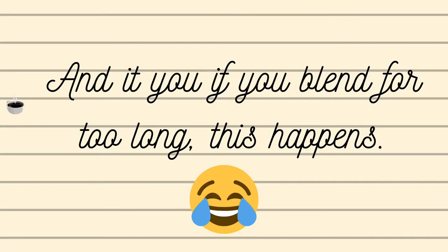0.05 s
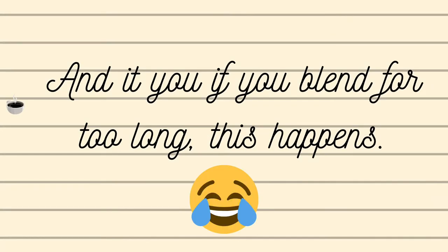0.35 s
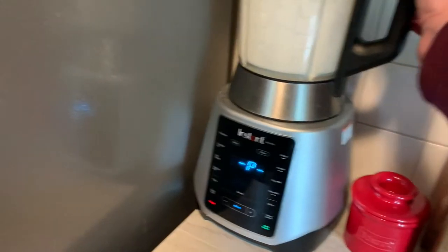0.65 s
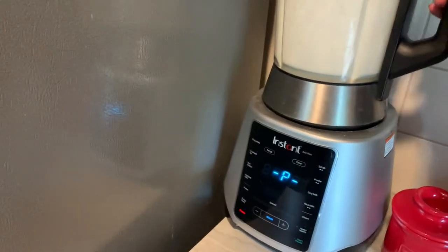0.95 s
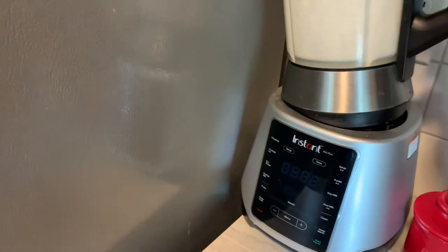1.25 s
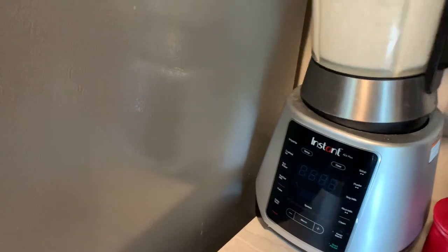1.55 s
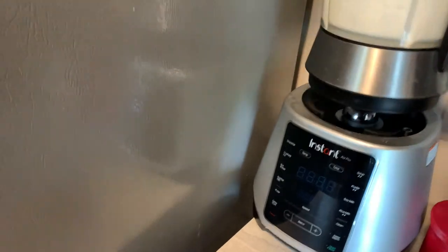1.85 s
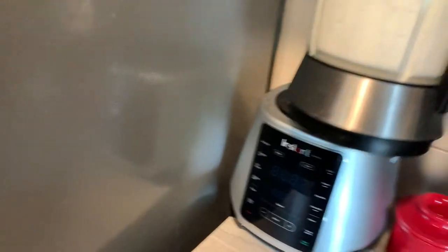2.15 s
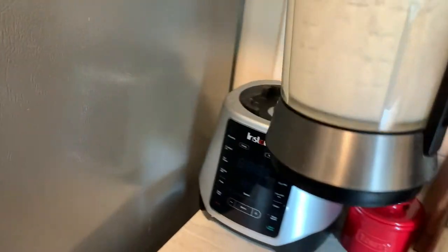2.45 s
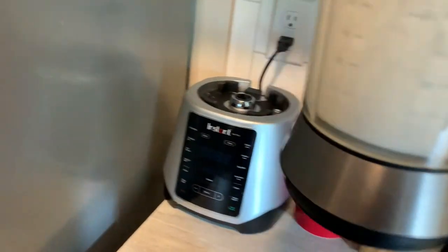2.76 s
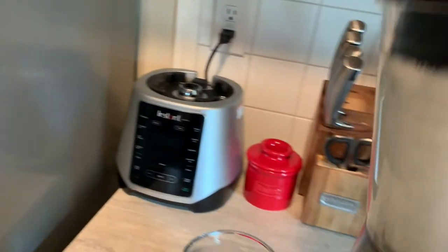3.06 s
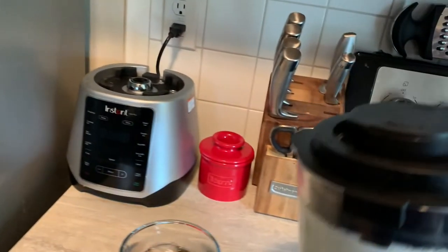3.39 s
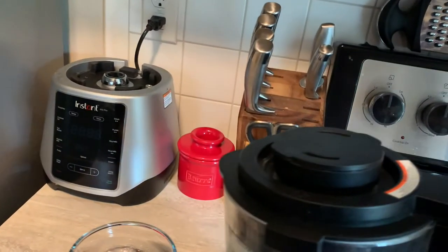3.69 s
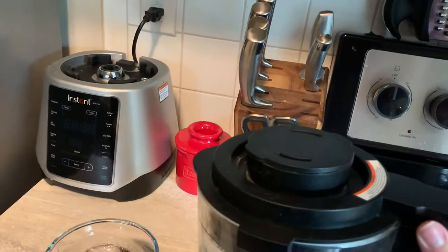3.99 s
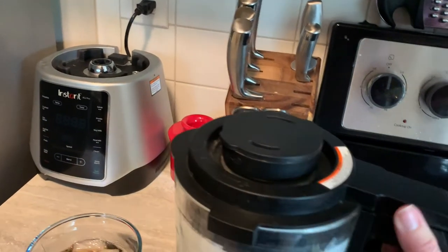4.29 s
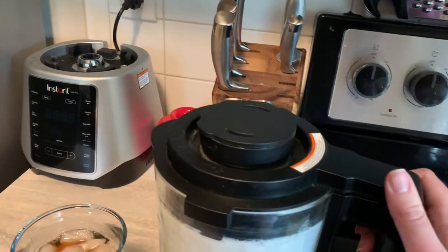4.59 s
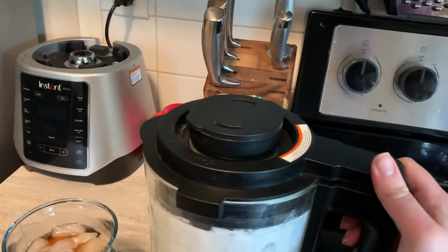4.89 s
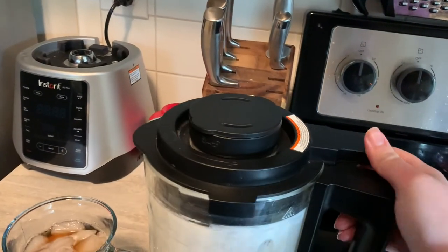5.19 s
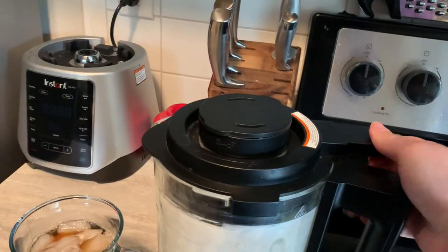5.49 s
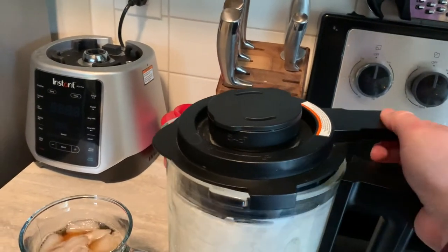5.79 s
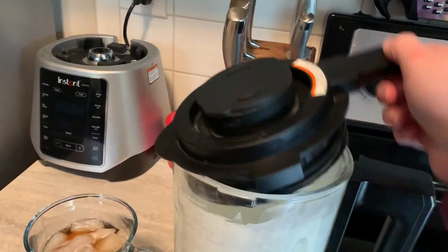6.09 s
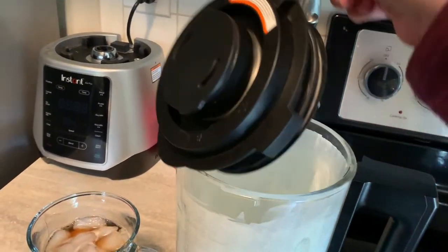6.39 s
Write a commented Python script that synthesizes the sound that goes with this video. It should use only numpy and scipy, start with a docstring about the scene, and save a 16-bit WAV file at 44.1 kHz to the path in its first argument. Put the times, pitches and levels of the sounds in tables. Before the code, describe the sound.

Heard up close in a small, hard-walled kitchen, a filled blender pitcher clicks, scrapes and bumps as it is worked off its base, the steel coupling pinging briefly. A sleeve swishes faintly, then the pitcher thumps down on the counter and wobbles, the loudest moment. Sharp plastic snaps follow, and the lid drags free with tiny squeaks and hollow taps. A low refrigerator hum continues underneath.

```python
"""A full plastic blender jug is worked off its base, set on a kitchen counter, and its lid pulled off.
Impacts excite damped normal modes: the jug clicks and knocks, the steel drive coupling pings, the
counter booms as the jug rocks to rest, and the lid's catches snap open. Sliding friction gives the
noise of rubbing plastic, grit and a brushing sleeve; stick-slip motion makes the rubber seal squeak.
The small, hard room reverberates, and a refrigerator hums throughout."""
import sys
import numpy as np
from scipy import signal
from scipy.fft import rfft, irfft, next_fast_len
from scipy.io import wavfile
from scipy.ndimage import uniform_filter1d

SR = 44100
rng = np.random.default_rng(int(sys.argv[2]) if len(sys.argv) > 2 else 0)


def put_to_file(sound):
    """Save the sound as 16-bit audio at rate SR, in the file named by the first command-line argument."""
    columns = np.atleast_2d(sound).T  # one column per channel
    safe = np.clip(columns, -1, 1)
    whole_steps = np.round(safe * 32767)
    wavfile.write(sys.argv[1], SR, whole_steps.astype(np.int16))


N = 293079
TIME = np.arange(N) / SR
RING_TIME = TIME[:SR // 3]


def undb(db):
    """Logarithmic level: decibels to amplitude ratio."""
    return 10 ** (np.asarray(db) / 20)


def decay(t60, t=RING_TIME):
    """Exponential damping: the amplitude falls by 60 dB in t60 seconds."""
    return np.exp(-np.log(1000) * t / t60)


def add(track, s, sound):
    """Superposition: a sound is summed into a track from time s on."""
    i = int(s * SR)
    track[..., i:i + sound.shape[-1]] += sound[..., :N - i]


def colour(x, spectrum):
    """Spectral shaping: x is filtered by (Hz, dB) points, falling steeply above the last; rms 1."""
    hz, db = np.transpose(spectrum)
    size = next_fast_len(x.shape[-1], True)
    f = np.fft.rfftfreq(size, 1 / SR) + 1
    gain = undb(np.interp(np.log(f), np.log(hz), db)) * np.minimum(hz[-1] / f, 1) ** 10
    y = irfft(rfft(x, size) * gain, size)[..., :x.shape[-1]]
    return y / np.std(y)


def stereo_noise(size, apart_hz=700, width=0.8):
    """Spatial coherence: white noise at two nearby points is alike in the bass, less so in the treble."""
    padded = next_fast_len(size, True)
    f = np.fft.rfftfreq(padded, 1 / SR)
    share = width * f / np.hypot(f, apart_hz)
    mid, side = rfft(rng.standard_normal((2, padded)))
    channels = np.array([mid + share * side, mid - share * side]) / np.sqrt(1 + share ** 2)
    return irfft(channels, padded)[:, :size]


def place(x, lag_s, pan_db):
    """Time and level cues to direction: the left channel is lag_s later and pan_db louder."""
    left, right = np.broadcast_to(x, (2, x.shape[-1]))
    t = TIME[:len(left)]
    return np.array([np.interp(t - lag_s, t, left) * undb(pan_db / 2), right * undb(-pan_db / 2)])


def wander(per_s):
    """Random modulation: per_s smoothed steps a second, with a spread near 1."""
    k = max(int(SR / per_s), 1)
    steps = np.repeat(rng.standard_normal(N // k + 1), k)
    return 1.3 * uniform_filter1d(uniform_filter1d(steps, k), k)[:N]


def swells(rows, attack_share):
    """Exponential growth and decay: each gesture rises and falls by 20 dB within its duration."""
    level_db = np.full(N, -200.0)
    for s, db, length in rows:
        from_peak = np.maximum((s - TIME) / attack_share, (TIME - s) / (1 - attack_share)) / length
        level_db = np.maximum(level_db, db - 20 * from_peak)
    return undb(level_db)


def ring(modes, scatter):
    """Free vibration: damped modes of alternating sign, randomly detuned by the share scatter; peak 1."""
    y = 0
    for k, (hz, db, t60) in enumerate(modes):
        phase = 2 * np.pi * hz * (1 + scatter * rng.standard_normal()) * RING_TIME
        y = y + (-1) ** k * undb(db) * np.sin(phase) * decay(t60)
    return y / np.max(np.abs(y))


def knocks(rows, modes, spread_db, t60_scale=1.0, rise_s=0.0014):
    """Modal excitation: the point struck weights the modes, which build up as the plastic flexes."""
    out = np.zeros(N)
    for s, db in rows:
        struck = [(hz, mode_db + spread_db * rng.uniform(-1.4, 1), t60 * t60_scale)
                  for hz, mode_db, t60 in modes]
        blow = ring(struck, scatter=0.0078) * (1 - np.exp(-RING_TIME / rise_s))
        add(out, s, undb(db) * blow / np.max(np.abs(blow)))
    return out


def jolts(per_s, spread_db):
    """Poisson process: one surface catches on another in random impulses of uneven size."""
    moment, size = rng.random(N), rng.standard_normal(N)
    return (moment < per_s / SR) * np.sign(size) * undb(spread_db * np.abs(size))


def scraping(rows, modes, per_s, spread_db, attack_share):
    """Forced vibration: quick jolts keep a sliding part ringing in a dry judder."""
    judder = signal.oaconvolve(jolts(per_s, spread_db), ring(modes, scatter=0.0033))[:N]
    return judder / np.std(judder) * swells(rows, attack_share)


# Compressor and fan tones: (frequency [Hz], level [dB])
HUM_TONES = [(59.3, -53.5), (122.8, -62), (184.7, -63), (355.3, -65), (414.8, -49), (473.9, -61.5),
             (552.5, -66.5), (602, -66.5), (1217, -90), (1244, -83)]
# Spectra of moving air and of fan hiss: (frequency [Hz], relative spectral density [dB])
AIR_SPECTRUM = [(20, -27.5), (40, -8), (65, -3.5), (100, -8.5), (180, -12.5), (300, -12.5), (450, -14.5),
                (700, -20.5), (1240, -25), (1330, -28)]
HISS_SPECTRUM = [(1500, 0), (2700, 0), (4200, -3), (6500, -9), (8500, -6), (13000, -9), (16000, -15)]

def fridge(air_db=-49.8, hiss_db=-75, waver_db=2.0, drift_rad=0.073):
    """Line spectrum over broadband noise: compressor and fan hum above the rush of moving air."""
    air = undb(air_db + 0.8 * wander(5)) * colour(stereo_noise(N), AIR_SPECTRUM)
    hiss = undb(hiss_db) * colour(stereo_noise(N), HISS_SPECTRUM)
    hum = 0
    for hz, db in HUM_TONES:
        amplitude = np.sqrt(2) * undb(db + waver_db * wander(3.014))
        hum = hum + amplitude * np.sin(2 * np.pi * hz * TIME + drift_rad * wander(0.75))
    return place(air + hiss + hum, lag_s=0.00046, pan_db=1.76)


# Resonances of the thin walls and lid: (frequency [Hz], bandwidth [Hz], relative gain [dB])
WALL_RESONANCES = [(339.2, 45, 0.5), (490, 18, 9), (571, 14, 12.5), (1031, 20, 7), (1239, 61, 10.5),
                   (1730, 43, 2.5), (2040, 73, 4), (2158, 220, 9.5), (2660, 110, 8), (2780, 34.6, 2.5),
                   (2980, 37, 12), (3460, 160, 12), (3840, 230, 3), (4220, 100, 1.5), (4990, 59, 7.5),
                   (5750, 38, 13.5), (6260, 95, 10)]

def walls(x, spread_db=3, ring_db=-2, local_db=5, local_q=45, local_count=12):
    """Resonant filtering: the spot touched weights the wall resonances and can add some of its own."""
    shared = [(hz, hz / width, db + spread_db * rng.uniform(-1, 1)) for hz, width, db in WALL_RESONANCES]
    local_hz = np.exp(rng.uniform(np.log(1000), np.log(14000), local_count))
    local = [(hz, local_q, local_db) for hz in local_hz]
    peaks = sum(undb(db) * signal.lfilter(*signal.iirpeak(hz, q, fs=SR), x)
                for hz, q, db in shared + local)
    return (x + undb(ring_db) * peaks) / 2


# Spectra of the low, middle and high parts of a click: (frequency [Hz], relative level [dB])
KNOCK_SPECTRUM = [(60, -21.5), (150, 9), (350, -1.5), (650, -3.5), (1100, -7), (1700, -15), (3000, -20)]
CLACK_SPECTRUM = [(500, -4.5), (1200, 0), (2000, -3.5), (4200, 8.5), (6000, -6.5), (8000, -6.5),
                  (14000, -39.5)]
TICK_SPECTRUM = [(3000, -43), (5500, -1), (7200, -9.5), (9000, 4.5), (12800, -2.5), (14500, -9),
                 (16000, -9.5)]

def clicks(rows, knock_db, tick_db, grain_db=4, gain_db=2.42):
    """Contact noise: edges chatter briefly, and a harder contact shifts energy from knock to tick."""
    out = np.zeros((2, N))
    size = 6000
    t = RING_TIME[:size]
    chatter = undb(grain_db * wander(500))
    for s, db, hardness, t60 in rows:
        knock = place(stereo_noise(size, width=0.65), lag_s=0.00022, pan_db=2.0)
        clack = place(stereo_noise(size), lag_s=0.000375, pan_db=1.7)
        tick = place(stereo_noise(size, width=0.47), lag_s=0, pan_db=4.0)
        click = 0
        for noise, spectrum, part_db, rise_s, part_t60 in [
                (knock, KNOCK_SPECTRUM, knock_db - hardness, 0.0022, 1.45 * t60),
                (clack, CLACK_SPECTRUM, 0, 0.018, t60),
                (tick, TICK_SPECTRUM, tick_db + hardness, 0.00052, t60)]:
            envelope = (1 - np.exp(-t / rise_s)) * decay(part_t60, t)
            envelope /= envelope.max()
            rough = envelope * chatter[int(s * SR):][:size]
            rough *= np.linalg.norm(envelope) / np.linalg.norm(rough)  # same energy as the smooth one
            click = click + undb(db + part_db) * rough * colour(noise, spectrum)
        add(out, s, walls(click))
    return undb(gain_db) * out


# Light contacts of the jug: (time [s], level [dB], hardness [dB], decay time T60 [s])
JUG_CLICKS = [(0.554, -58, 7.5, 0.043), (0.709, -55, -0.5, 0.016), (0.744, -43.5, 0.5, 0.082),
              (0.768, -47.5, -5.5, 0.031), (0.835, -42, 8.5, 0.026), (0.963, -51, -1, 0.016),
              (0.992, -46, 5, 0.022), (1.016, -61, -14.5, 0.048), (1.098, -45, 6.5, 0.098),
              (1.118, -38.5, 8, 0.065), (1.277, -49.5, 1.5, 0.025), (1.603, -52, -3, 0.08),
              (1.685, -31, 2.5, 0.021), (1.694, -50, -9.5, 0.048), (1.737, -53, 9.5, 0.0076),
              (3.472, -64.5, 3.5, 0.03), (3.860, -40, 1.5, 0.03), (3.948, -43, -5, 0.015),
              (3.984, -56, -10, 0.086), (4.022, -47.5, 7, 0.064), (4.123, -47, 2.5, 0.067),
              (4.156, -50.5, -13, 0.029), (4.272, -52.5, 8.5, 0.037), (4.318, -55.5, 6, 0.032),
              (5.669, -64.5, -5, 0.018), (6.002, -46.5, 3, 0.045), (6.085, -54, -7.5, 0.022),
              (6.161, -56.5, -8, 0.044), (6.302, -60, 0, 0.028), (6.402, -57, 6, 0.03)]

def jug_clicks():
    """Impact transients: the hollow jug clicks against base, counter and hand."""
    return clicks(JUG_CLICKS, knock_db=12.5, tick_db=-3.5)


# Strokes of sliding plastic and rubber: (peak time [s], level [dB], duration [s])
RUB_STROKES = [(0.60, -70, 0.93), (0.79, -55, 0.44), (1.12, -55, 1), (1.60, -58.5, 0.66),
               (4.045, -45.5, 0.36), (4.62, -55.5, 0.18), (4.89, -47.5, 0.14), (5.905, -53, 0.024),
               (5.975, -50, 0.13), (6.12, -60, 0.52), (6.307, -58, 0.04), (6.408, -56, 0.06)]
# Their friction spectrum: (frequency [Hz], relative level [dB])
RUB_SPECTRUM = [(200, -12), (600, -3), (1200, 6), (1700, -3.5), (3000, -2), (4500, -0.5), (7000, -14),
                (9000, -2), (13000, -24.5), (14500, -14.5), (16000, -26)]

def rubbing(grain_db=-0.5, gain_db=4):
    """Sliding friction: surfaces catch and slip in tiny grains, exciting walls damped by the hand."""
    grip = undb(grain_db * wander(600))
    friction = colour(stereo_noise(N) * grip, RUB_SPECTRUM) * swells(RUB_STROKES, attack_share=0.65)
    return undb(gain_db) * walls(friction, spread_db=2, ring_db=-8, local_count=0)


# Hard blows on the side of the jug: (time [s], level [dB])
SIDE_BLOWS = [(0.744, -29), (0.768, -23.5), (1.103, -47.5), (1.121, -32), (1.278, -40.5), (1.687, -17),
              (1.694, -27.5)]
# Twists of the jug in its seat: (peak time [s], level [dB], duration [s])
JUG_TWISTS = [(0.752, -42, 0.036), (0.778, -44.5, 0.053), (1.024, -50, 0.034), (1.135, -45.5, 0.062)]
# Modes of the side: (frequency [Hz], relative level [dB], decay time T60 [s])
SHELL_MODES = [(497, -7, 0.07), (573, -3.5, 0.06), (638, 1, 0.06), (800, -5, 0.06), (1006, -7, .06),
               (1067, -7, 0.07), (1550, -3, 0.035), (1870, -6, 0.04), (2030, -3, 0.04), (2240, -5.5, 0.035),
               (2530, -4, 0.038), (3300, -8, 0.03), (4200, -9, 0.025)]

def jug_side():
    """Shell vibration: the same modes ring when the jug is knocked and judder when it is twisted."""
    blows = knocks(SIDE_BLOWS, SHELL_MODES, spread_db=2)
    twist = scraping(JUG_TWISTS, SHELL_MODES, per_s=420, spread_db=3.5, attack_share=0.25)
    return place(blows + twist, lag_s=0.00036, pan_db=-2)


# Padded blows of the jug's foot on the motor base: (time [s], level [dB], contact time [ms])
FOOT_BUMPS = [(0.765, -26.5, 8.3), (1.070, -31, 6.9), (1.608, -14.5, 3.16), (1.689, -33, 1.8),
              (1.771, -20, 3.1), (1.785, -32, 1.3), (1.803, -36, 2.3), (1.959, -34, 7.9)]
# Modes of the base: (frequency [Hz], relative level [dB], decay time T60 [s])
MOTOR_BASE_MODES = [(123, -14.5, 0.23), (181, 0.5, 0.097), (221.8, 3, 0.044), (260, -2.5, 0.07),
                    (398, 7, 0.02)]

def base_bumps(contacts=3, bounce_s=0.01473, bounce_db=-16):
    """Contact time limits bandwidth: the longer the bouncing foot's half-sine push, the duller it is."""
    out = np.zeros(N)
    for s, db, contact_ms in FOOT_BUMPS:
        push = np.sin(np.pi * np.minimum(RING_TIME[:SR // 50] * 1000 / contact_ms, 1))
        thump = signal.fftconvolve(ring(MOTOR_BASE_MODES, scatter=0.022), push)
        thump /= np.max(np.abs(thump))
        start = s - contact_ms / 2000  # the push is centred on s
        for k in range(contacts):
            add(out, start + k * bounce_s, undb(db + k * bounce_db) * thump)
    return out


# Drags of the foot over grit on base and counter: (peak time [s], level [dB], duration [s])
GRIT_DRAGS = [(0.775, -60, 0.29), (0.88, -70, 0.23), (1.14, -54, 0.062), (3.868, -45.5, 0.04),
              (4.04, -59, 0.27), (4.22, -60.5, 0.15), (4.36, -64, 0.25)]
# Spectrum of the grit: (frequency [Hz], relative level [dB])
GRIT_SPECTRUM = [(2000, -28.5), (5000, -5), (7200, -12), (8500, -2.5), (11500, -3.5), (13500, -4.5),
                 (15500, -15)]

def grit(hiss_db=-4):
    """Shot noise: hard specks crackle under the sliding foot, over a finer sandy hiss."""
    specks = jolts(per_s=867, spread_db=5)
    crackle = colour(specks / np.std(specks) + undb(hiss_db) * stereo_noise(N), GRIT_SPECTRUM)
    return place(crackle * swells(GRIT_DRAGS, attack_share=0.2), lag_s=0, pan_db=0.5)


# Shifts of the jug's weight: (peak time [s], level [dB], duration [s])
WEIGHT_SHIFTS = [(0.8, -50, 0.86), (1.25, -46.5, 0.89), (2.05, -46, 1), (4.08, -28.5, 0.33),
                 (5.48, -38, 0.099), (5.99, -37, 0.078), (6.102, -33.5, 0.066), (6.29, -36.5, 0.049)]
# Spectrum of their rumble: (frequency [Hz], relative level [dB])
RUMBLE_SPECTRUM = [(25, -20), (55, -6.5), (110, 7.5), (180, -2), (300, -19), (500, -65.5)]

def weight_rumble():
    """Structure-borne noise: a low rumble swells as the jug's weight shifts."""
    return swells(WEIGHT_SHIFTS, attack_share=0.34) * colour(stereo_noise(N), RUMBLE_SPECTRUM)


# Blows of the lid on the rim of the jug: (time [s], level [dB])
LID_BLOWS = [(1.014, -42), (4.944, -34.5), (5.989, -35), (6.002, -42), (6.085, -26), (6.162, -28.5),
             (6.277, -36)]
# Drags of the lid up the wall: (peak time [s], level [dB], duration [s])
LID_DRAGS = [(5.925, -51, 0.064), (5.975, -46, 0.088), (6.10, -51, 0.079), (6.18, -55.5, 0.16)]
# Modes of the lid, struck and dragged: (frequency [Hz], relative level [dB], decay time T60 [s])
STRUCK_LID_MODES = [(318, -2.5, 0.11), (377, -2.5, 0.099), (493, -12, 0.037), (586, -7, 0.041),
                    (858, 2, 0.073), (972, -4, 0.081), (1079, -8, 0.06), (1214, 3, 0.07),
                    (2034, -18.5, .03), (2340, -10, 0.096), (2870, -14, 0.083)]
DRAGGED_LID_MODES = [(1198, 5.5, 0.095), (1690, -11, 0.027), (2070, -2, .04), (2600, 0, .03),
                     (3430, -13, 0.045), (4100, -25, 0.027)]

def lid():
    """Free and forced vibration: the hand-damped lid rings after blows and judders as it is dragged."""
    blows = knocks(LID_BLOWS, STRUCK_LID_MODES, spread_db=7.5, t60_scale=0.94, rise_s=0.004)
    drag = scraping(LID_DRAGS, DRAGGED_LID_MODES, per_s=840, spread_db=2.5, attack_share=0.54)
    return place(blows + drag, lag_s=0.00026, pan_db=-4.5)


# Squeaks: (time [s], duration [s], start frequency [Hz], glide [share of frequency], level [dB])
SQUEAK_CHIRPS = [(1.098, 0.032, 476, 0.023, -32.5), (5.67, 0.038, 5140, 0.0048, -70),
                 (5.678, 0.041, 4090, -0.093, -61), (5.72, 0.044, 3550, -0.14, -58),
                 (6.077, 0.011, 8900, 0.15, -45), (6.086, 0.034, 10100, -0.1, -50.5),
                 (6.104, 0.047, 11500, -0.078, -57), (6.127, 0.041, 8400, 0.14, -55),
                 (6.17, 0.0237, 10100, -0.155, -54), (6.192, 0.02, 9800, .2, -55),
                 (6.236, 0.027, 9900, -0.15, -55), (6.283, 0.016, 9500, -0.16, -57),
                 (6.313, 0.034, 10400, 0.021, -70)]

def squeaks(waver=0.017, flutter_db=2.5, rasp_db=-4, rasp_q=10, gain_db=-5):
    """Stick-slip oscillation: plastic and the wet seal chirp unsteadily, with a rasp around the pitch."""
    out = np.zeros(N)
    wobble = 1 + waver * wander(900)
    for s, length, start_hz, glide, db in SQUEAK_CHIRPS:
        progress = np.linspace(0, 1, int(length * SR))
        hz = start_hz * (1 + glide * progress) * wobble[int(s * SR):][:len(progress)]
        rasp = signal.lfilter(*signal.iirpeak(start_hz, rasp_q, fs=SR), rng.standard_normal(len(hz)))
        chirp = np.sin(2 * np.pi * np.cumsum(hz) / SR) + undb(rasp_db) * rasp / np.std(rasp)
        add(out, s, undb(db) * np.sin(np.pi * progress) * chirp)
    return place(out * undb(gain_db + flutter_db * wander(400)), lag_s=0, pan_db=4.0)


# Teeth of the drive coupling slipping past each other: (time [s], level [dB])
TOOTH_SLIPS = [(1.118, -19.5), (1.131, -17.5)]
# Modes of the steel coupling: (frequency [Hz], relative level [dB], decay time T60 [s])
STEEL_MODES = [(6097, -17, .12), (9345, 17, .058), (9330, -7, .22), (9582, -2, .11), (12800, 3, .025)]

def coupling(rise_s=0.0023):
    """Free vibration on release: the steel teeth ping one after another as they let go."""
    out = np.zeros(N)
    for s, db in TOOTH_SLIPS:
        add(out, s, undb(db) * ring(STEEL_MODES, scatter=0.00067) * (1 - np.exp(-RING_TIME / rise_s)))
    return place(out, lag_s=0, pan_db=3)


# Strokes of a sleeve and fingers: (peak time [s], level [dB], duration [s])
BRUSH_STROKES = [(3.28, -57.5, 0.34), (4.37, -60.5, 0.32), (5.08, -63.5, 0.56), (5.355, -61.5, 0.11),
                 (5.475, -62, 0.18)]
# Their friction spectrum: (frequency [Hz], relative level [dB])
BRUSH_SPECTRUM = [(900, -24), (1600, -4.5), (2900, 1), (4500, -3), (7200, -12), (8600, -0.5), (12000, -11),
                  (15500, -16)]

def brushing(grain_db=1.5, patchy_db=-2.0):
    """Modulated friction noise: cloth and skin sweep by with a soft, finely grained swish."""
    grip = undb(grain_db * wander(1600) + patchy_db * wander(29.96))
    return colour(stereo_noise(N) * grip, BRUSH_SPECTRUM) * swells(BRUSH_STROKES, attack_share=0.63)


# Blows as the jug lands and rocks: (time [s], counter level [dB], jug level [dB], rim level [dB])
LANDING_BLOWS = [(3.862, -8.5, -5, -20), (3.950, -7, -7.5, -22.5), (3.979, -39, -12.5, -23),
                 (3.993, -8.5, -13, -33), (4.017, -17, -25, -30), (4.121, -17, -20.5, -25),
                 (4.154, -13, -9, -35), (4.212, -19, -30.5, -47)]
# Modes of counter, filled jug and hard rim: (frequency [Hz], relative level [dB], decay time T60 [s])
COUNTERTOP_MODES = [(80.7, -6, 0.17), (113.4, -0.5, 0.25), (155, 0.5, 0.11), (199, -8.5, 0.098)]
FULL_JUG_MODES = [(294.8, -2, 0.094), (325.8, 3.5, 0.062), (338.6, 3.5, 0.065), (383, -2.5, 0.098),
                  (456, -7.5, 0.12), (470, -5, 0.072), (530, -11.5, 0.083), (618, -11.5, 0.14),
                  (704, -25.5, 0.23), (800, -15.5, 0.081), (880, -16.5, 0.053), (976, -23.5, 0.12)]
BOTTOM_RIM_MODES = [(850, 0, .04), (1056, -1.5, 0.05), (1320, -4, 0.04), (1443, -6, 0.04), (1584, 2, 0.035),
                    (1700, -8, .04), (1860, -5, 0.04), (2100, -4.5, 0.04), (2400, -9, 0.04),
                    (3660, -12, .035)]

def landing(settle_s=0.00893, settle_counter_db=-2.5, settle_jug_db=-14.5):
    """Action and reaction: the jug lands edge first with a clack, and each blow rings jug and counter."""
    out = knocks([(s, rim_db) for s, _, _, rim_db in LANDING_BLOWS], BOTTOM_RIM_MODES, spread_db=2)
    for s, counter_db, jug_db, _ in LANDING_BLOWS:
        counter = undb(counter_db) * ring(COUNTERTOP_MODES, scatter=0.0023)
        jug = undb(jug_db) * ring(FULL_JUG_MODES, scatter=0.015)
        add(out, s, counter + jug)
        # the rest of the rim comes down
        add(out, s + settle_s, undb(settle_counter_db) * counter + undb(settle_jug_db) * jug)
    return out


# The lid's catches snapping open: (time [s], level [dB], hardness [dB], decay time T60 [s])
CATCH_SNAPS = [(4.584, -41.5, 2.5, 0.0097), (4.694, -50, -5.5, 0.03), (4.845, -45.5, -1.5, 0.045),
               (4.853, -38.5, 0.5, 0.027), (4.869, -43, 1.5, 0.019), (4.945, -46.5, -6.5, 0.058),
               (4.946, -42, 11, 0.014)]
# Their ringing on release: (time [s], level [dB])
CATCH_RELEASES = [(4.585, -41), (4.696, -45), (4.855, -25), (4.869, -40), (4.946, -40)]
# Modes of a springy catch: (frequency [Hz], relative level [dB], decay time T60 [s])
SPRING_MODES = [(1050, -10, 0.16), (1230, -16, 0.13), (1604, -5, 0.044), (2760, -7.5, 0.098),
                (3580, -7.5, 0.045), (3654, -2, 0.041), (4410, 0, 0.032), (4540, -2, 0.033),
                (5400, -11, .05), (8200, -12, 0.049)]

def catches():
    """Release of elastic energy: the springy catches let go with a click and ring on."""
    snaps = clicks(CATCH_SNAPS, knock_db=-1, tick_db=0)
    ringing = knocks(CATCH_RELEASES, SPRING_MODES, spread_db=6.0, t60_scale=0.88)
    return snaps + place(ringing, lag_s=0.00026, pan_db=0)


def kitchen(x, wet_db=-10, bass_db=-4, low_t60=0.51, high_t60=0.31, build_s=0.0053):
    """Reverberation: tiles and cupboards return a short, dense echo, weaker but longer in the bass."""
    noise = stereo_noise(len(RING_TIME))
    low = signal.sosfilt(signal.butter(1, 600, fs=SR, output="sos"), noise)
    tail = undb(bass_db) * low * decay(low_t60) + (noise - low) * decay(high_t60)
    tail *= 1 - np.exp(-(RING_TIME / build_s) ** 2)
    tail /= np.sqrt(np.sum(tail ** 2) / 2)
    return x + undb(wet_db) * signal.fftconvolve(tail, x, axes=1)[:, :N]


def scene():
    """Superposition: the handling sounds and their reverberation add to the refrigerator's hum."""
    plastic = jug_clicks() + jug_side() + lid() + catches()
    friction = rubbing() + grit() + squeaks() + brushing()
    thumps = place(base_bumps() + landing(), lag_s=0.00017, pan_db=0.8)
    return fridge() + kitchen(plastic + friction + thumps + weight_rumble() + coupling())


def record(dry, start_s=0.4004, fade_s=0.02, low_cut_hz=38, high_cut_hz=15900):
    """Gating and band limiting: sound begins after a short silence, without its deepest bass and top."""
    gate = np.clip((TIME - start_s) / fade_s, 0, 1)
    thinned = signal.sosfilt(signal.butter(4, low_cut_hz, "high", fs=SR, output="sos"), dry * gate)
    return signal.sosfilt(signal.ellip(8, 0.2, 70, high_cut_hz, fs=SR, output="sos"), thinned)


dry = scene()
out = record(dry)
put_to_file(out)
```